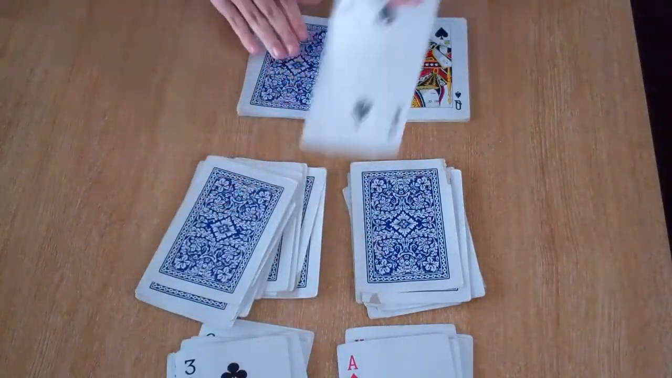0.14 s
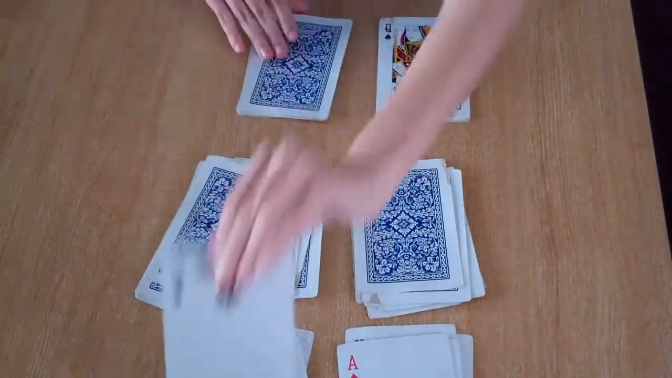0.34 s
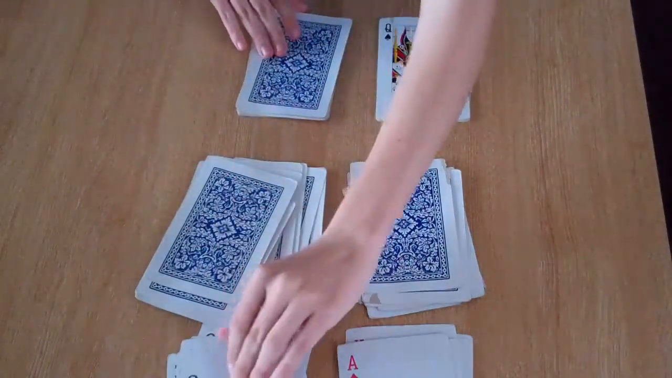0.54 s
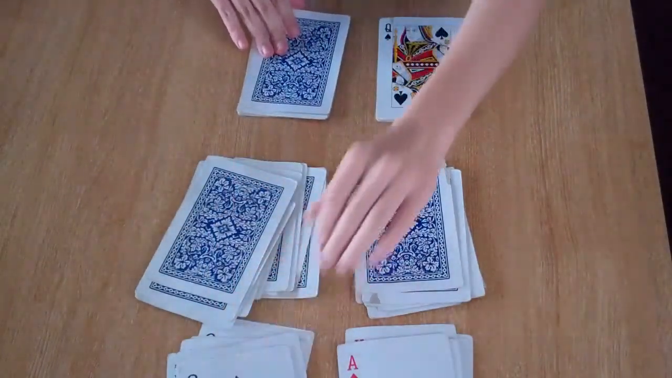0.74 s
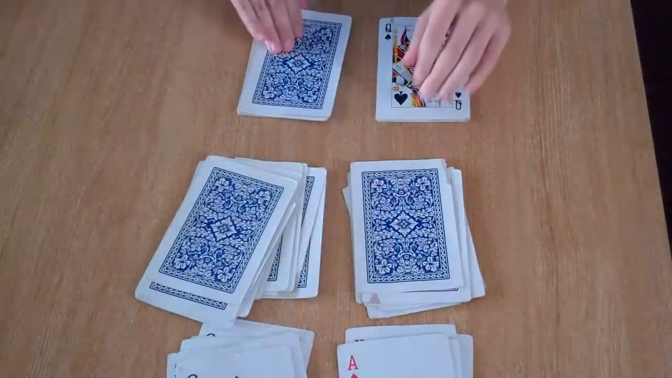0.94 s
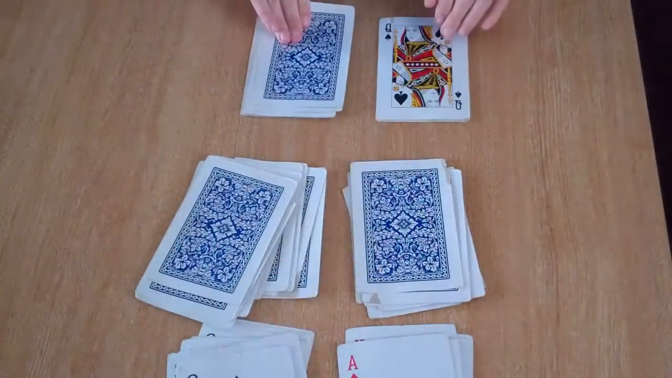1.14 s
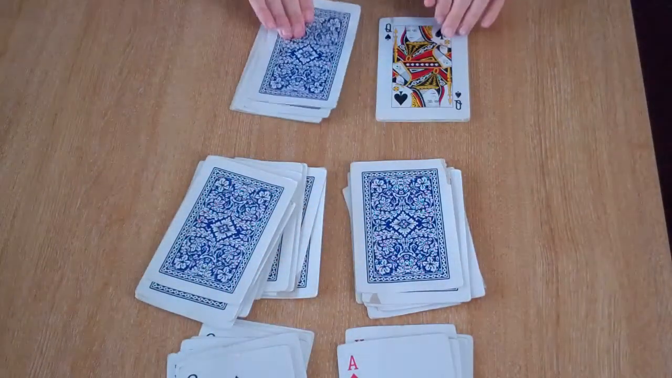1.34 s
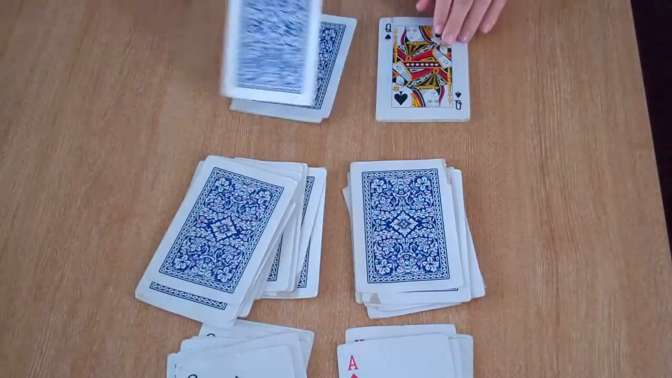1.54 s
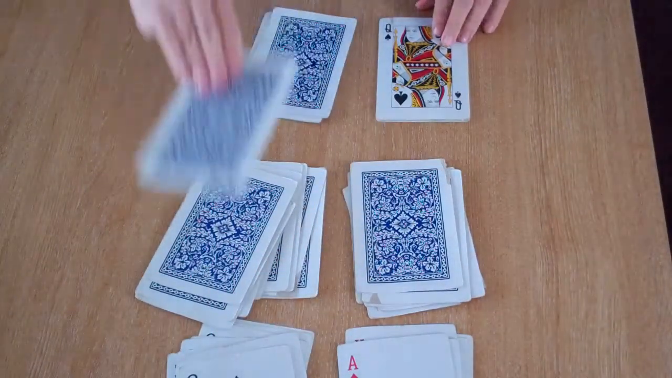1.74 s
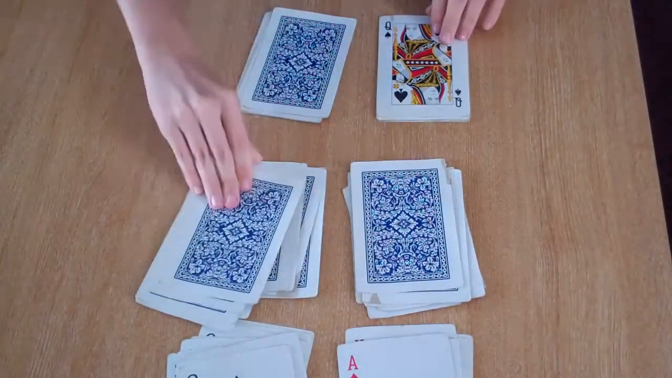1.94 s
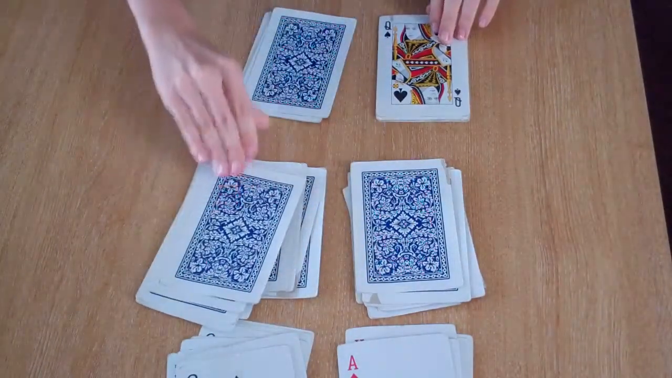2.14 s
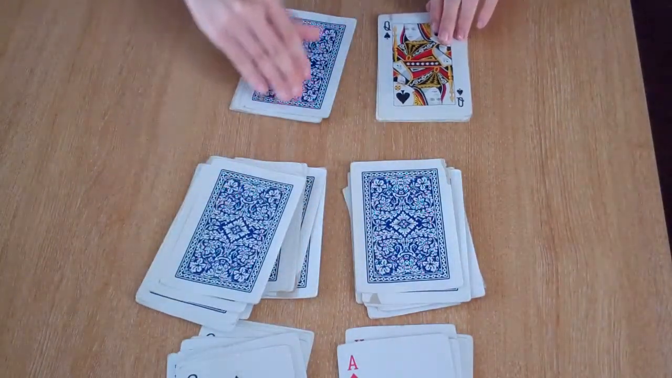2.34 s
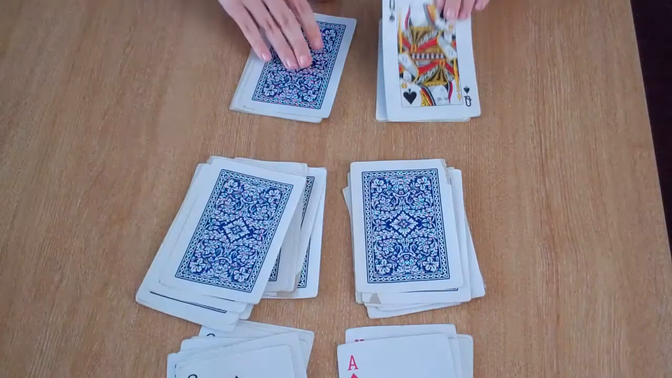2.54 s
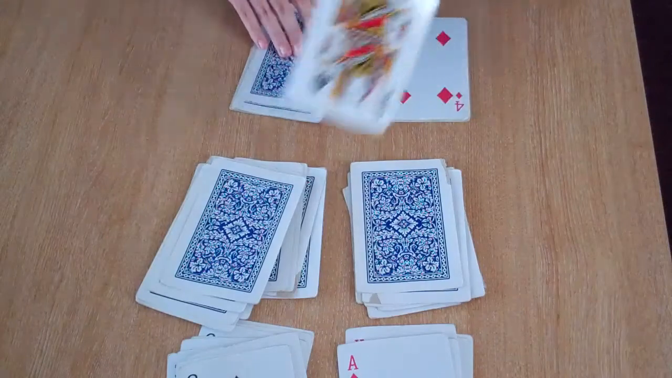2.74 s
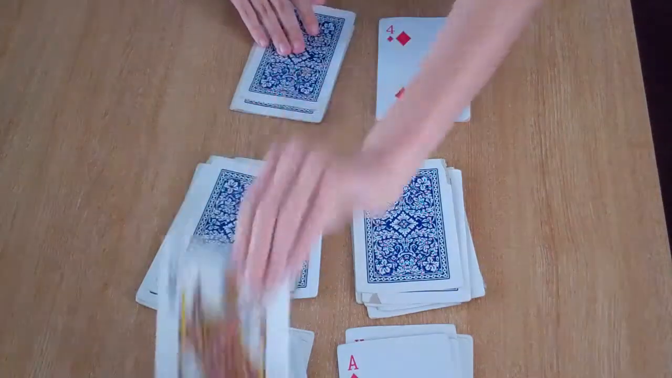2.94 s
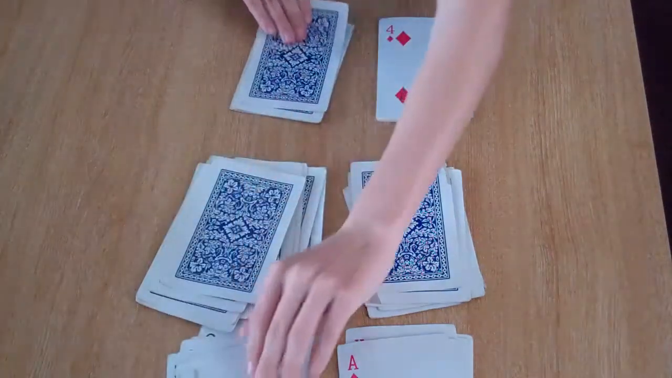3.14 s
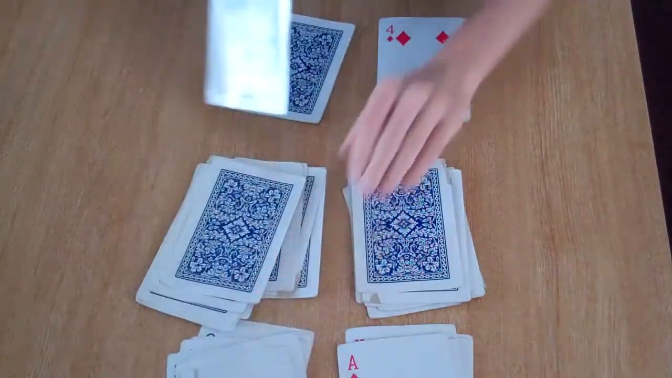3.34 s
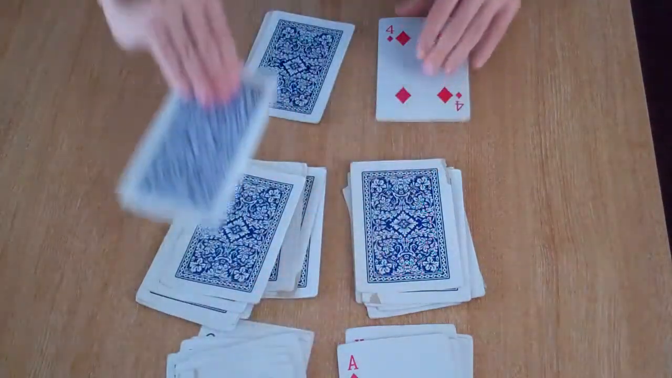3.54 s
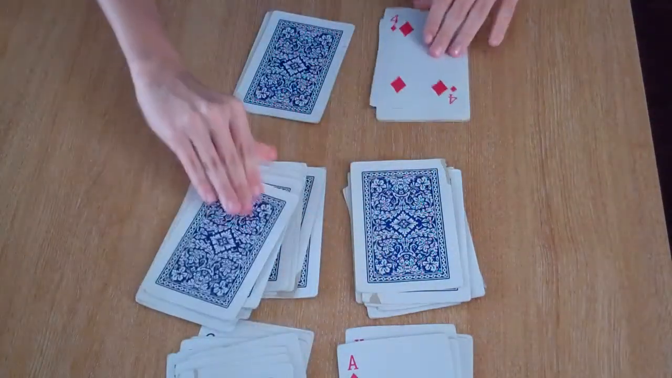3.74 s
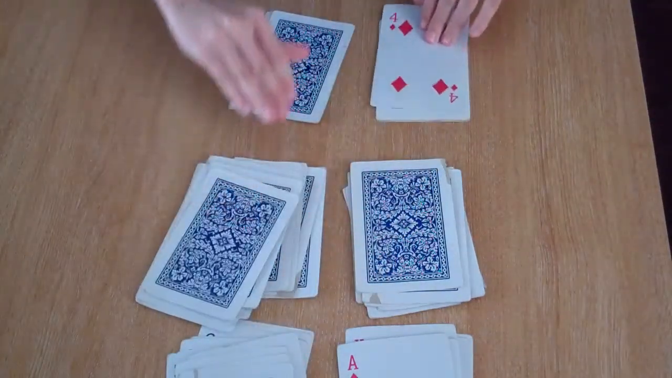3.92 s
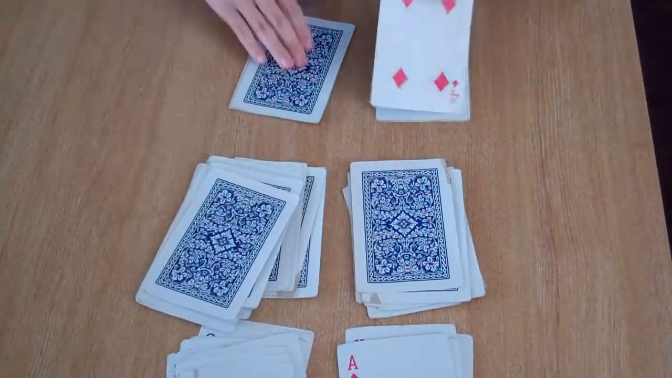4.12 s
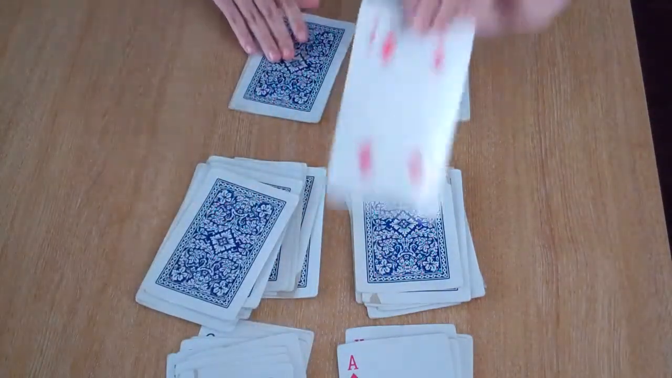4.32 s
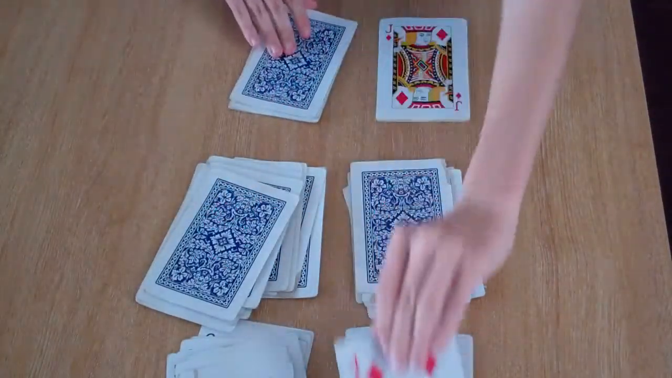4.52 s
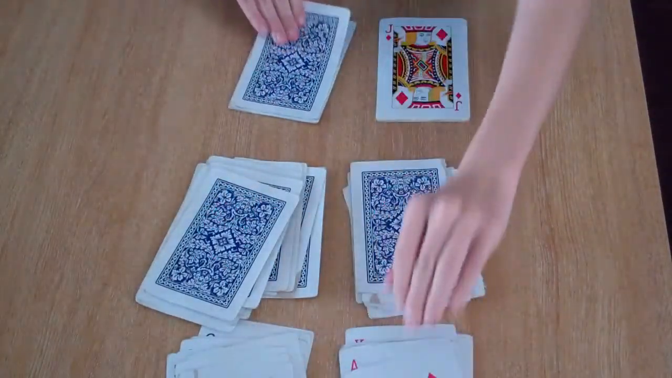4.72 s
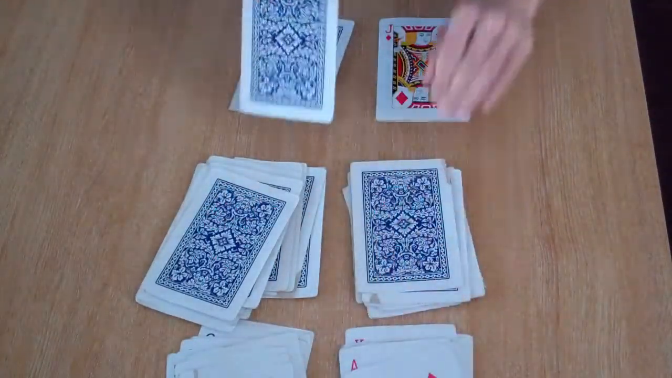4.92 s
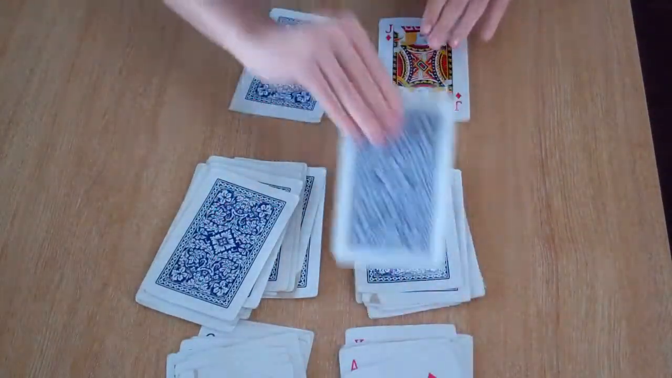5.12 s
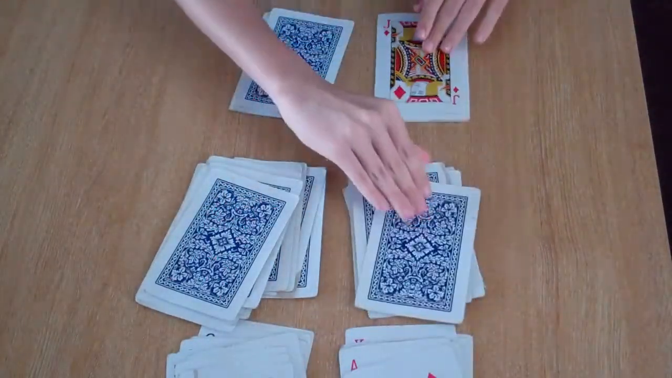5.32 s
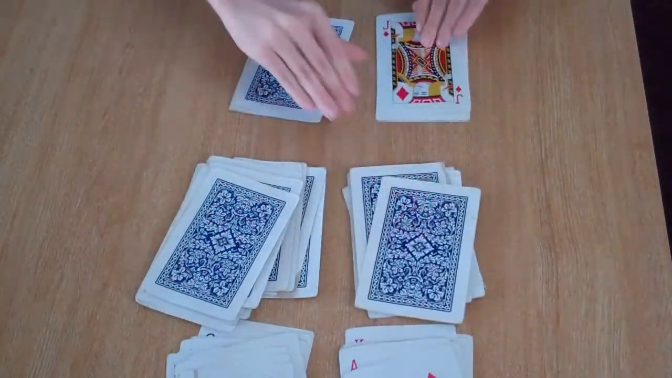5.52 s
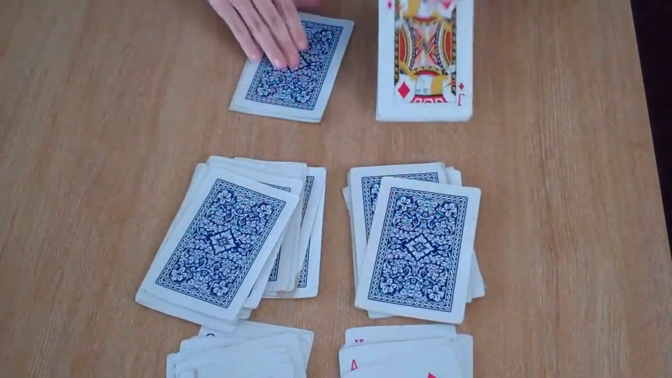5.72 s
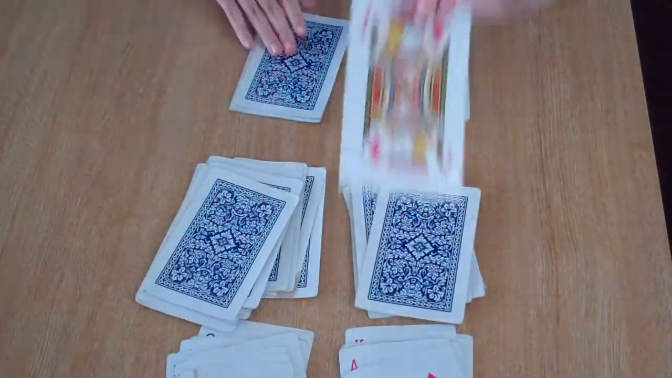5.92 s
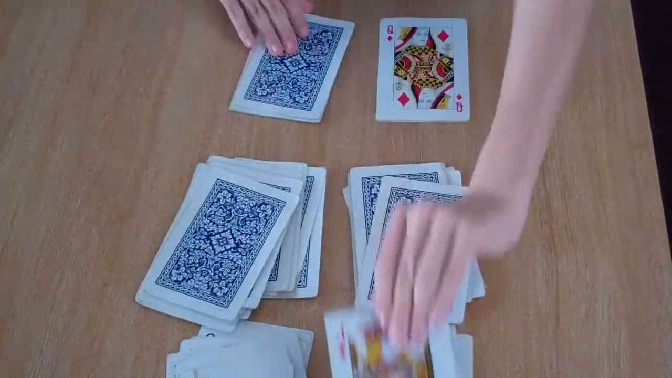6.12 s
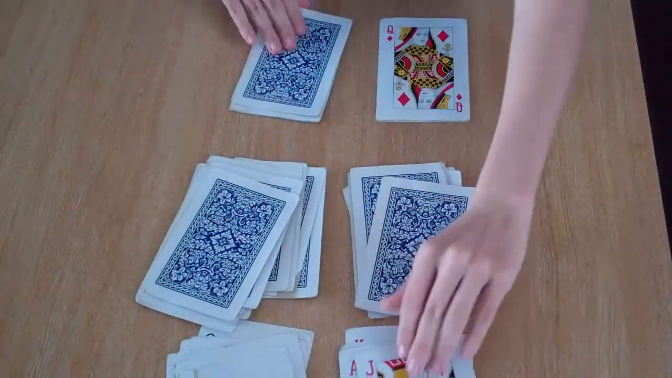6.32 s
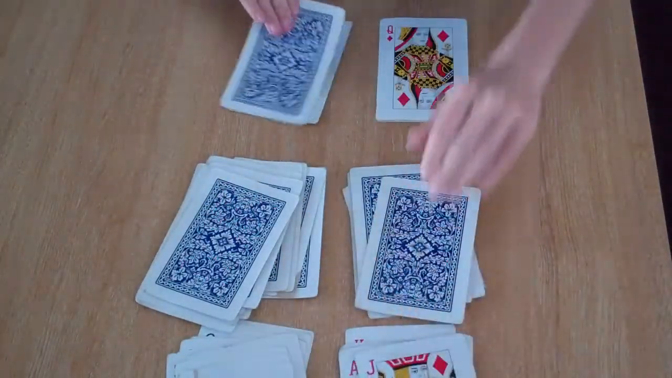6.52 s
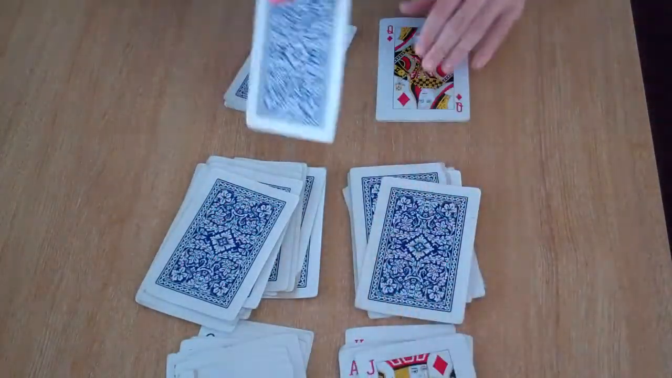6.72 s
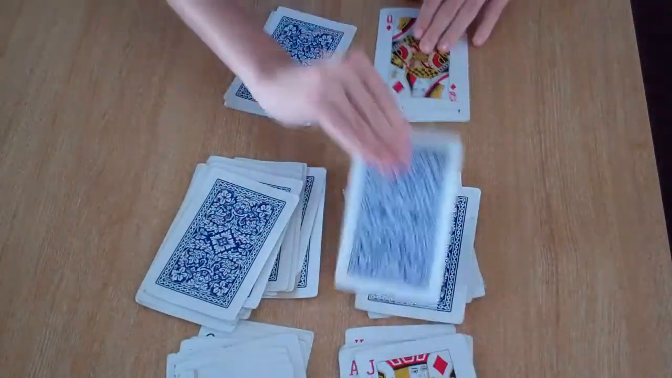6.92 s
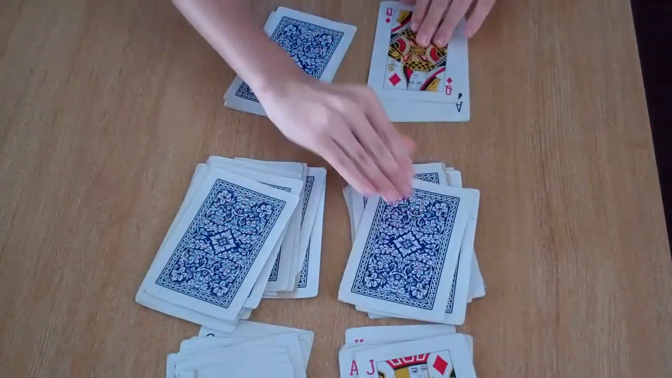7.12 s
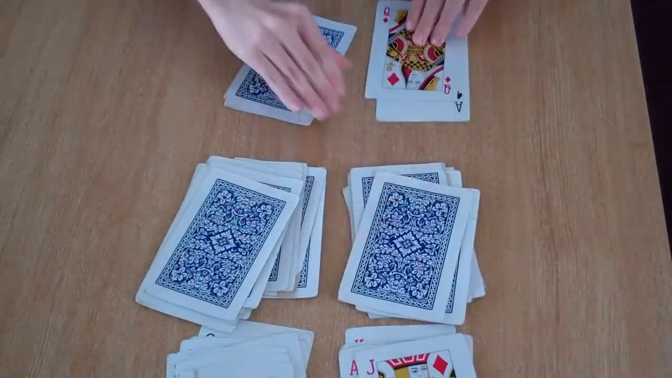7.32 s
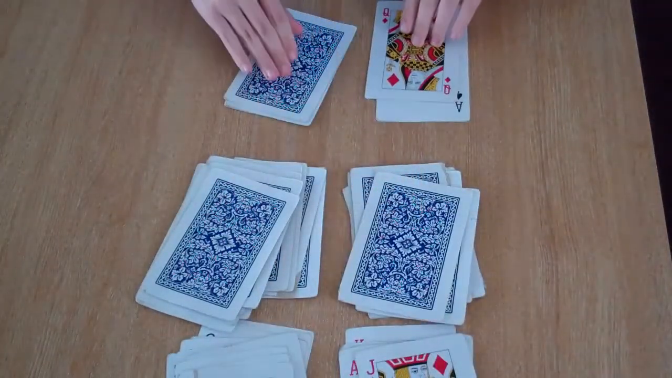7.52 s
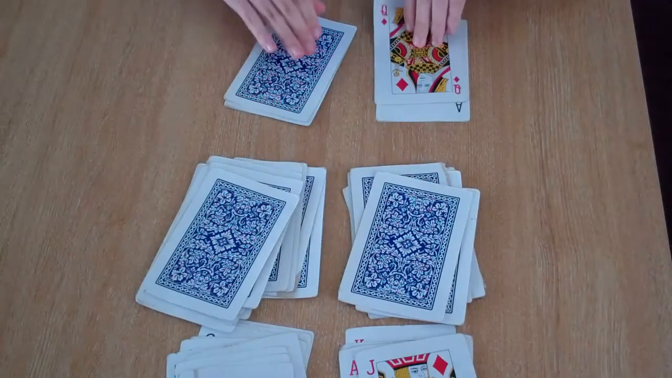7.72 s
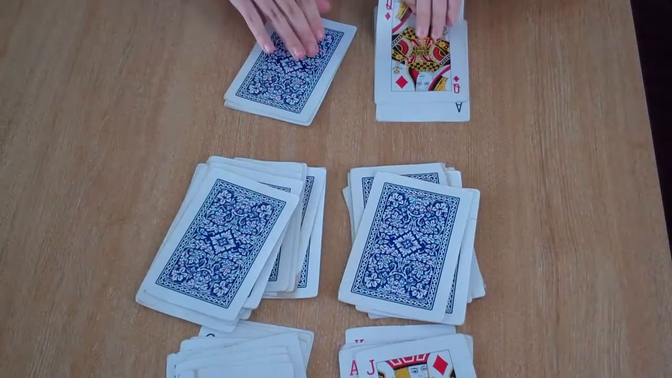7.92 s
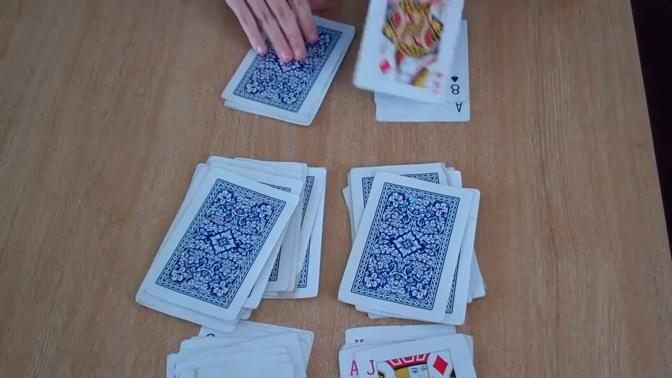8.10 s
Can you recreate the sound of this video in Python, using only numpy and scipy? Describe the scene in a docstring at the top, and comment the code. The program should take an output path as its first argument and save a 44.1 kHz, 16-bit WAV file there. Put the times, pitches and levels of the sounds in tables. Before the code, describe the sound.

Close up in a small quiet room, playing cards are dealt one by one onto piles on a wooden table. Each edge ticks sharply and its face lands with a tiny hollow pop, usually followed by a brief papery skid and flick. Fingers faintly brush the deck between deals. A soft fan hum stays behind, dipping slightly after loud snaps as the microphone adjusts its level.

```python
"""Playing cards snap and slap down one by one onto piles on a wooden table, close by in a small quiet room.
Each card's edge ticks and makes the card flex; its face squeezes out air with a hollow pop. Most cards then
skid, as swelling friction noise that ends in a flick; others slide, and fingers brush the deck in short strokes.
Soft thuds of the hand and a humming fan, made of noise and wavering tones, lie behind.
The camera's gain control turns everything down after loud snaps."""
import sys
import numpy as np
from scipy import signal
from scipy.fft import rfft, irfft, next_fast_len
from scipy.io import wavfile
from scipy.ndimage import uniform_filter1d, map_coordinates

SR = 44100
rng = np.random.default_rng(int(sys.argv[2]) if len(sys.argv) > 2 else 0)


def materialize(psi):
    """Save the field psi as 16-bit PCM at rate SR to the path in sys.argv[1].

    A 1-D psi becomes a single channel; in a 2-D psi each row is a channel.
    """
    bounded = np.clip(np.atleast_2d(psi).T, -1, 1)
    quanta = np.round(bounded * 32767).astype(np.int16)
    wavfile.write(sys.argv[1], SR, quanta)


N = 359856

# One row per dealt card, edge first and then face:
# (edge lands [s], snap level [dB], card flex [Hz], higher flex modes [dB], tick against flex [dB],
#  face lands after the edge [s], slap level [dB], low pop [Hz], time for a pop to fall 60 dB [s],
#  high pop [Hz], high pop against low pop [dB], puff of air against pop [dB])
DEALS = [(0.4275, -18, 2020, -2.5, -2.5,     .008, -22.5, 690, .018, 880, -11, -6),
         (1.8693, -20, 1850, 2.5, -10,    .002, -37.5, 890, 0.023, 1420, -9, -2),
         (3.0312, -19, 1770, -10, -9,   .001, -29, 550, 0.051, 1047, 2.5, -5),
         (3.6564, -23.5, 2000, -0.5, 9.5,     .002, -34, 826, 0.031, 1290, 0, -8),
         (4.5465, -10.5, 1760, -1, -7,  0.0039, -16.5, 1020, 0.024, 1683, -1, -6),
         (5.206, -16, 1630, 3.5, -3.5,     .0025, -19, 815, .03, 1370, -6.5, -10),
         (6.1449, -12.5, 1890, 6.5, -10,  0.0022, -29.5, 947, 0.051, 1310, 4, -15),
         (6.972, -28, 1620, -1, -2,     0.00083, -25.5, 830, 0.021, 1290, -11, -18)]
# Colour of paper noise: (frequency [Hz], relative level [dB])
PAPER_COLOUR = [(200, -10), (1200, -4), (2100, -0.5), (2800, 0), (5000, -1), (7000, -3.5), (9000, -5),
                (12000, -13.5), (15000, -45)]
# How alike card noise is in both ears: (frequency [Hz], likeness [1 = the same])
CARD_ALIKE = [(500, 0.98), (1500, 0.91), (4000, 0.71), (10000, 0.3)]


def snaps(size=8192, chatter_db=-12, chatter_t60=0.013, wood_db=-34, contact_hz=7000):
    """An edge ticks on the pile, the card flexes and chatters, and the table rings faintly."""
    # Colour of the sharp tick: (frequency [Hz], relative level [dB])
    tick_colour = [(200, -15), (700, -1.5), (1200, 4.5), (2100, -3.5), (3600, 7), (5200, 7), (7200, -4),
                   (9200, -3), (12000, -26.5), (16000, -32)]
    # A card's bending modes: (multiple of the flex frequency [times], level [dB], time to fall 60 dB [s])
    flex_modes = [(1, -1.5, 0.0074), (1.42, -2.5, 0.0034), (2.8, -8.5, 0.0055)]
    track, t = np.zeros((2, N)), np.arange(size) / SR
    tick = pulse(tick_colour, size)
    for s, db, hz, upper_db, tick_db in edge_contacts():
        flex = np.zeros(size)
        for i, (multiple, mode_db, t60) in enumerate(flex_modes):
            mode_hz = multiple * hz
            sign = (-1) ** i  # neighbouring modes push the air in opposite directions
            extra_db = upper_db if i > 0 else 0
            reach = 1 / (1 + (mode_hz / contact_hz) ** 4)  # the contact is too slow for the highest modes
            flex += sign * amp(mode_db + extra_db) * reach * ring(t, mode_hz, t60)
        chatter = amp(chatter_db - 60 * t / chatter_t60) * noise(PAPER_COLOUR, CARD_ALIKE, size)
        contact = 0.68 * flex + amp(tick_db) * (tick + chatter) + amp(wood_db) * table_ring(t)
        add(track, s, in_room(-amp(db) * contact, wet_db=-9))
    return track


def edge_contacts():
    """Every dealt edge grazes, strikes and rebounds; corners catch only once.

    Rows of (time [s], level [dB], flex [Hz], higher modes [dB], tick against flex [dB])."""
    # A card's corner catching lightly on another: (time [s], level [dB])
    catches = [(1.8712, -28.5), (1.9081, -35.5), (1.9115, -44), (1.928, -39), (3.1213, -33), (4.383, -53),
               (4.6755, -43.5), (6.383, -45.5), (7.8639, -37.5), (7.939, -33)]
    catch_hz, catch_tick_db = 3560, 2.5  # a corner's flex; its tick against the flex
    graze_before_s, graze_db = .003, -38.5  # equally light every time
    rebound_after_s, rebound_db = .0022, -9  # the level is against the main blow
    rebound_stiffer = 1.37  # times the flex frequency
    rows = []
    for s, db, hz, upper_db, tick_db, *_ in DEALS:
        rows.append((s - graze_before_s, graze_db, hz, 0, 0))
        rows.append((s, db, hz, upper_db, tick_db))
        rows.append((s + rebound_after_s, db + rebound_db, hz * rebound_stiffer, upper_db, tick_db))
    return rows + [(s, db, catch_hz, 0, catch_tick_db) for s, db in catches]


def slaps(size=8192, attack=0.00059, wood_db=-25, flutter=.13):
    """The face lands on a cushion of air: a hollow, fluttering pop that also shakes the table."""
    # Colour of the escaping air: (frequency [Hz], relative level [dB])
    puff_colour = [(150, -24), (400, -4), (750, -1), (1800, -1.5), (3000, -13), (9000, -32), (14000, -39)]
    track, t = np.zeros((2, N)), np.arange(size) / SR
    for s, db, hz, t60, puff_db in air_pops():
        # the pitch wavers as the gap closes
        waver = 1 + flutter * unit(uniform_filter1d(rng.standard_normal(size), size=60))
        hollow = np.sin(2 * np.pi * np.cumsum(hz * waver) / SR)
        puff = amp(puff_db) * noise(puff_colour, CARD_ALIKE, size)
        air = (hollow + puff) * amp(-60 * t / t60)
        pop = (air + amp(wood_db) * table_ring(t)) * (1 - np.exp(-t / attack))
        add(track, s, in_room(-amp(db) * pop, wet_db=-9))
    return track


def air_pops():
    """The face follows the edge and squeezes the air out in two pops.

    Rows of (time [s], level [dB], pitch [Hz], time to fall 60 dB [s], puff against pop [dB])."""
    high_pop_after_s = .004
    rows = []
    for s, *_, after, db, low_hz, t60, high_hz, high_db, puff_db in DEALS:
        rows.append((s + after, db, low_hz, t60, puff_db))
        rows.append((s + after + high_pop_after_s, db + high_db, high_hz, t60, puff_db))
    return rows


def table_ring(t, scatter_db=2):
    """The table's modes, at new strengths for every blow."""
    # The wooden table: (frequency [Hz], typical level [dB], time to fall 60 dB [s])
    wood_modes = [(563.5, -10, 0.22), (690, -16, 0.09), (805, -28, 0.085), (1123, 0.5, 0.15),
                  (1615, -7, .08), (1781, 4, 0.073), (2580, -16, 0.065)]
    return sum(amp(db + rng.normal(0, scatter_db)) * ring(t, hz, t60) for hz, db, t60 in wood_modes)


def strokes(rows, spectrum, grain_db, width_hz, overtone=1.403, overtone_share=0.89, size=16384):
    """Friction swells and stops; fibres catch in tiny grains that stir two of the card's bending modes."""
    track, t = np.zeros((2, N)), np.arange(size) / SR

    def band(offset):
        return 1 / (1 + (offset / width_hz) ** 2)

    for s, db, rise, fall, hz, lift_db in rows:
        def bending(f):
            return amp(lift_db * (band(f - hz) + overtone_share * band(f - overtone * hz)))

        start = max(s - 5 * rise, 0)
        since_peak = start + t - s
        swell = np.exp(-np.maximum(-since_peak / rise, since_peak / fall))
        grains = amp(grain_db * unit(uniform_filter1d(rng.standard_normal(size), size=24)))
        rub = swell * filtered(noise(spectrum, CARD_ALIKE, size) * grains, bending)
        rub *= np.sqrt(np.mean(swell ** 2) / np.mean(rub ** 2))  # the grains share out the stroke's energy
        add(track, start, in_room(amp(db) * rub, wet_db=-15.5))
    return track


def card_strokes():
    """Skids that swell and end in a flick, and slides of a card pushed across its pile.

    Rows of (peak time [s], level [dB], rise [s], fall [s], brightest band [Hz], its lift [dB])."""
    # The laid card skids ever harder until it slips free:
    # (flick time [s], skid level [dB], flick level [dB], brightest band [Hz], its lift [dB])
    skid_rows = [(.5392, -43, -29.5, 3170, 12.5), (1.9506, -49.5, -37.5, 4500, 5),
                 (3.1275, -44.5, -37.5, 3650, 4), (4.6367, -45, -36.5, 3040, 13.5),
                 (5.321, -45.5, -54, 3500, 8.5), (6.2965, -51, -35.5, 2860, 21.5),
                 (7.068, -48.5, -46.5, 3800, 3)]
    # A card pushed across its pile, gliding to rest: (peak time [s], level [dB], rise [s], fall [s])
    slide_rows = [(3.675, -46.5, 0.0086, 0.044), (6.964, -54.5, 0.0018, 0.036), (7.863, -52, .014, .04),
                  (7.941, -46.5, .002, 0.026), (7.982, -49.5, 0.023, 0.0062)]
    skid_lead_s, skid_rise_s, skid_fall_s = .004, .011, 0.0026  # the skid peaks just ahead of the flick
    flick_rise_s, flick_fall_s = .002, 0.0013
    slide_hz, slide_lift_db = 3750, 7
    rows = []
    for s, skid_db, flick_db, hz, lift_db in skid_rows:
        rows.append((s - skid_lead_s, skid_db, skid_rise_s, skid_fall_s, hz, lift_db))
        rows.append((s, flick_db, flick_rise_s, flick_fall_s, hz, lift_db))
    return rows + [(*slide, slide_hz, slide_lift_db) for slide in slide_rows]


def finger_strokes():
    """Fingertips brush the deck; each brush swells quickly and fades more slowly.

    Rows of (peak time [s], level [dB], rise [s], fall [s], brightest band [Hz], its lift [dB])."""
    # One row per brush: (peak time [s], level [dB], rise and fall together [s], lift of brightest band [dB])
    brush_rows = [(0.047, -55.5, .018, 15), (1.112, -50, 0.017, 10), (1.149, -56.5, 0.077, 9),
                  (1.301, -59.5, 0.063, 1), (2.479, -57, .04, 0), (2.636, -58, 0.02, 7),
                  (3.156, -58.5, 0.05, 10)]
    brush_hz, rise_share = 9000, .35  # brightest band; part of the length spent swelling
    return [(s, db, rise_share * length, (1 - rise_share) * length, brush_hz, lift_db)
            for s, db, length, lift_db in brush_rows]


def thuds(hz=66, t60=0.21, attack=0.012):
    """The table top gives dully under the soft weight of the hand."""
    # The hand settling on the table: (time [s], level [dB])
    hand_rows = [(1.955, -50), (3.135, -49), (5.25, -54)]
    track, t = np.zeros((2, N)), np.arange(SR // 2) / SR
    for s, db in hand_rows:
        add(track, s, amp(db) * ring(t, hz, t60) * (1 - np.exp(-t / attack)))
    return track


def fan(air_db=-55.5, hum_db=1.5, waver_db=1.5):
    """Soft, steady rushing air with unsteady hum tones and a thin whine."""
    # Colour of the rushing air: (frequency [Hz], relative level [dB])
    air_colour = [(20, -12.5), (45, -10), (70, -9), (125, -5), (170, -10.5), (250, -7), (450, -8),
                  (640, -8.5), (800, -10), (1100, -10.5), (3000, -14.5), (5850, -18.5), (9950, -28),
                  (12400, -39.5), (14000, -73)]
    # How alike the air is in both ears: (frequency [Hz], likeness [1 = the same])
    air_alike = [(60, 0.28), (130, 0.49), (290, 0.5), (640, 0.26), (1410, 0.16), (3100, 0.088),
                 (6820, 0.075), (15000, 0.087)]
    # Fan tones: (frequency [Hz], level before hum_db [dB], scale of the pitch wander [Hz])
    hum_tones = [(120, -69.5, 1.25), (207.9, -65, 1.44), (306, -78.5, 4.2), (323.4, -74.5, 5.48),
                 (402, -76, 5.46), (539, -75.5, 13.86), (622, -73.5, 5.9), (6600, -83.5, 2),
                 (7820, -81.5, 1.94), (7920, -81, 2)]
    hum = np.zeros(N)
    for hz, tone_db, wander in hum_tones:
        strength = amp(tone_db + waver_db * wobble(6))
        pitch = hz + wander * wobble(14)
        hum += strength * np.sin(2 * np.pi * np.cumsum(pitch) / SR)
    return amp(air_db) * noise(air_colour, air_alike, N) + amp(hum_db) * hum


def in_room(sound, wet_db, gap=.006):
    """A sound and, after a short gap, the walls' answer, which differs from spot to spot."""
    # The room's fading: (frequency [Hz], time to fall 60 dB [s])
    room_fade = [(200, 0.35), (1000, 0.16), (4000, 0.17), (10000, 0.27)]
    flat_noise = noise([(100, 0), (16000, 0)], CARD_ALIKE, SR // 4)
    hz, t, z = signal.stft(flat_noise, SR, nperseg=256)
    fade = amp(-60 * t / along(room_fade, hz)[:, None])  # each pitch dies at its own pace
    tail = signal.istft(z * fade, SR, nperseg=256)[1]
    tail = np.pad(tail / np.linalg.norm(tail[0]), ((0, 0), (round(abs(gap) * SR), 0)))
    answer = signal.fftconvolve(np.atleast_2d(sound), tail, axes=1)[:, :sound.shape[-1]]
    return sound + amp(wet_db) * answer


def amp(db):
    """Decibels to gain."""
    return 10 ** (np.asarray(db) / 20)


def unit(x):
    """Scale to rms 1."""
    return x / np.sqrt(np.mean(x ** 2) + 1e-20)


def along(points, hz):
    """Read (frequency, value) points between their entries on a log frequency axis."""
    f, v = np.transpose(points)
    return np.interp(np.log(hz + 1), np.log(f + 1), v)


def wobble(rate):
    """A smooth random curve through rate random values a second."""
    knots = rng.standard_normal(int(N * rate / SR) + 4)
    return map_coordinates(knots, [np.arange(N) * rate / SR])


def filtered(x, response):
    """Make each frequency of x stronger or weaker by the given response."""
    n = x.shape[-1]
    m = next_fast_len(n + 4096)
    return irfft(rfft(x, m) * response(np.fft.rfftfreq(m, 1 / SR)), m)[..., :n]


def pulse(spectrum, size):
    """A click of peak 1 with this spectrum that starts at once, with nothing before its onset."""
    gain = amp(along(spectrum, np.fft.rfftfreq(size, 1 / SR)))
    cepstrum = irfft(np.log(gain), size)
    # keeping only the doubled first half puts the energy as early as possible
    shape = irfft(np.exp(rfft(2 * cepstrum[:size // 2], size)), size)
    return shape / np.abs(shape).max()


def noise(spectrum, alike, size):
    """Coloured stereo noise of rms 1, partly shared by both ears."""
    def colour(hz):
        turn = np.arccos(np.clip(along(alike, hz), -1, 1)) / 2
        return amp(along(spectrum, hz)) * [np.cos(turn), np.sin(turn)]

    mid, side = filtered(rng.standard_normal((2, size)), colour)
    return unit(np.array([mid + side, mid - side]))


def ring(t, hz, t60):
    """One dying tone, which falls 60 dB in t60 seconds."""
    return np.sin(2 * np.pi * hz * t) * amp(-60 * t / t60)


def add(track, s, sound):
    """Mix a sound into the track at time s."""
    start = max(round(s * SR), 0)
    track[:, start:start + sound.shape[-1]] += sound[..., :N - start]


def panned(x, lean):
    """Shift each frequency towards the left or right ear."""
    return filtered(x, lambda hz: amp(along(lean, hz) * np.array([[.5], [-.5]])))


def gain_control(x, size=128):
    """A loud peak at the output turns the gain down, at first too far; it is held there, then creeps back."""
    trigger_db, cut_ratio, max_cut_db = -18.5, 2, 6  # cut_ratio: dB of cut per dB over the trigger
    attack_s, hold_s, recover_db_per_s = 0.029, 0.53, 5.5
    overshoot, settle_s = 0.8, 0.078  # share by which a fresh cut goes too deep; its settling time
    step = size / SR  # seconds per block
    blocks = np.abs(x.mean(axis=0))[:N // size * size].reshape(-1, size)
    peaks_db = 20 * np.log10(blocks.max(axis=1) + 1e-9)

    def lagging(v, lag_s):
        keep = np.exp(-step / lag_s)
        return signal.lfilter([1 - keep], [1, -keep], v)

    cut_db, last_peak, cuts = 0, 0, []
    for i, peak_db in enumerate(peaks_db):
        over_db = peak_db - cut_db - trigger_db
        if over_db > 0:
            cut_db = min(cut_db + cut_ratio * over_db, max_cut_db)
            last_peak = i
        elif (i - last_peak) * step > hold_s:
            cut_db = max(cut_db - recover_db_per_s * step, 0)
        cuts.append(cut_db)
    eased = lagging(cuts, attack_s)
    eased = eased + overshoot * np.maximum(eased - lagging(eased, settle_s), 0)
    # the cut acts one block late
    return x * amp(-np.interp(np.arange(N) / size - 1, np.arange(len(eased)), eased))


def scene():
    """Cards and room, all a little to the left."""
    # Colour of skin rubbing the deck: (frequency [Hz], relative level [dB])
    skin_colour = [(500, -23), (2500, -1), (4000, -2), (7000, -3.5), (9800, -6.5), (12000, -18),
                   (15000, -37)]
    # How well a small card sends out sound: (frequency [Hz], gain [dB])
    card_radiation = [(40, -21), (150, -0.5), (400, -5), (600, 1), (10000, -0.5), (12500, -4.5),
                      (15000, -15)]
    # Sideways lean of the cards: (frequency [Hz], left minus right [dB])
    card_lean = [(500, 2.5), (2000, 2.5), (5000, 4), (8500, 10), (12000, 4.5)]
    # Sideways lean of the thuds and fan: (frequency [Hz], left minus right [dB])
    background_lean = [(60, 5), (110, 2), (200, 3.5), (380, 2.5), (700, 2.5), (1290, 2.5), (2380, 2),
                       (4400, 2), (8120, 2.5), (15000, 2)]
    skids_and_slides = strokes(card_strokes(), PAPER_COLOUR, grain_db=3.5, width_hz=310)
    brushes = strokes(finger_strokes(), skin_colour, grain_db=5.5, width_hz=450)
    cards = snaps() + slaps() + skids_and_slides + brushes
    cards = filtered(cards, lambda hz: amp(along(card_radiation, hz)))
    return panned(cards, card_lean) + panned(thuds() + fan(), background_lean)


def record(dry):
    """The camera ducks after loud peaks and keeps nothing above its band limit."""
    top_hz = 16300
    return filtered(gain_control(dry), lambda hz: hz < top_hz)


dry = scene()
out = record(dry)
materialize(out)
```